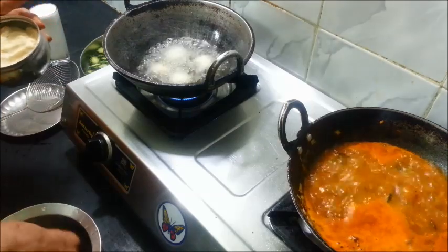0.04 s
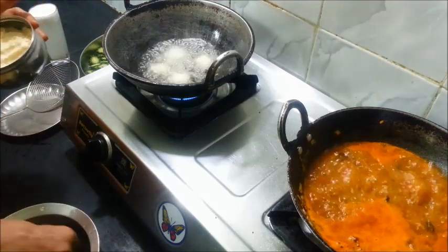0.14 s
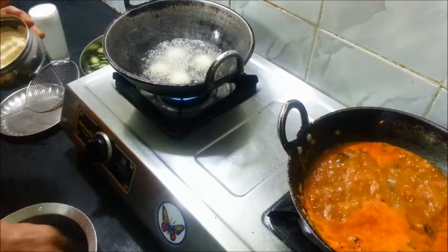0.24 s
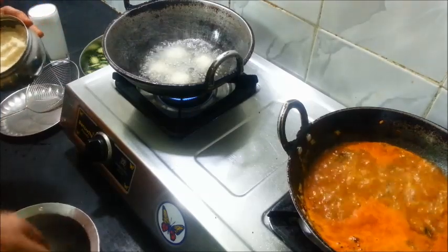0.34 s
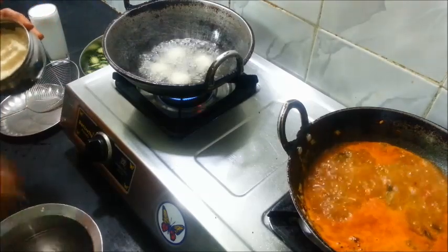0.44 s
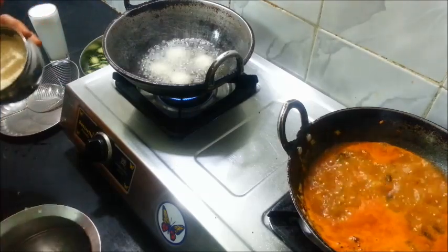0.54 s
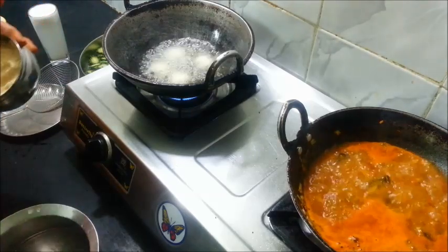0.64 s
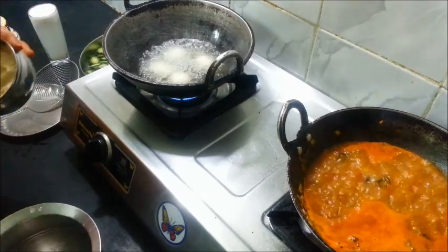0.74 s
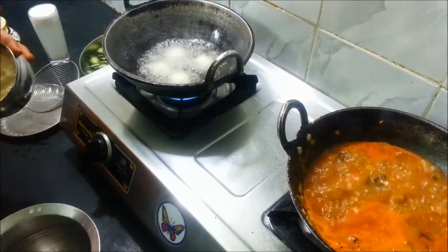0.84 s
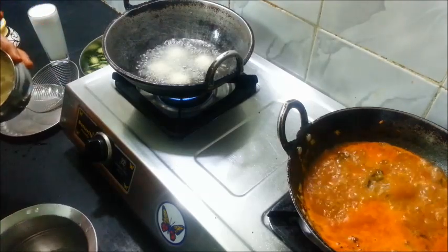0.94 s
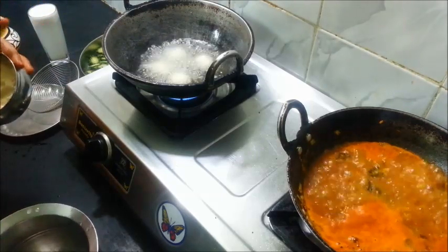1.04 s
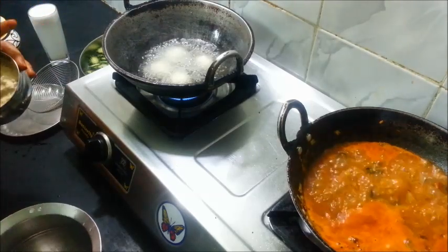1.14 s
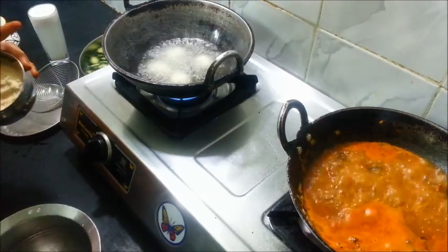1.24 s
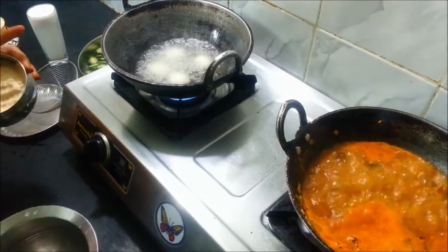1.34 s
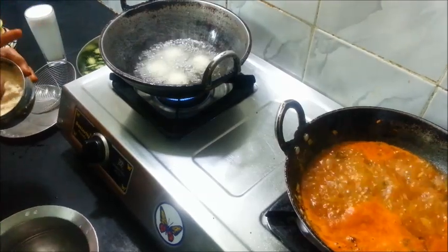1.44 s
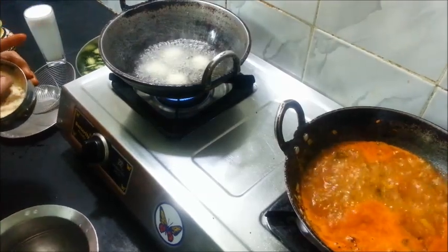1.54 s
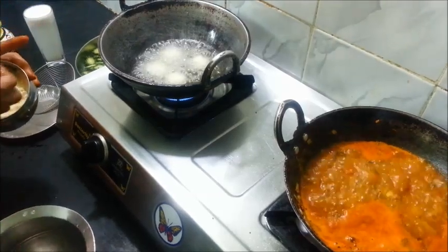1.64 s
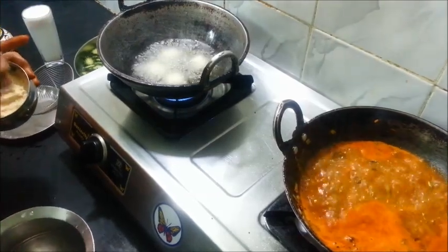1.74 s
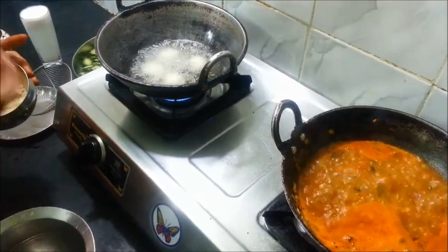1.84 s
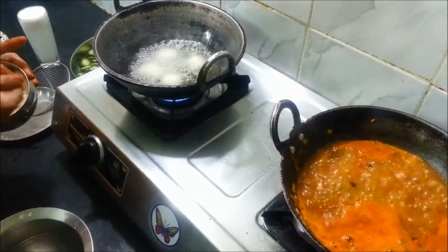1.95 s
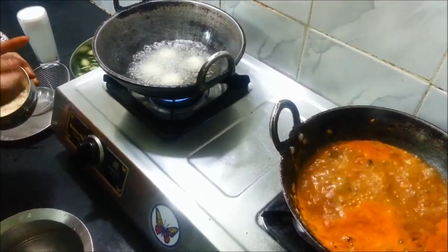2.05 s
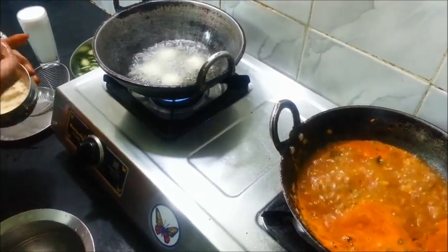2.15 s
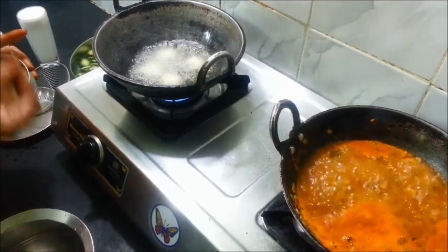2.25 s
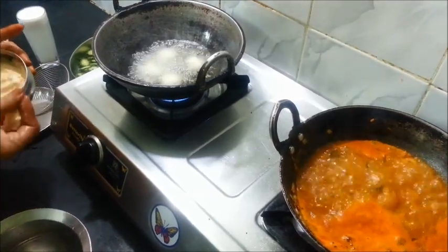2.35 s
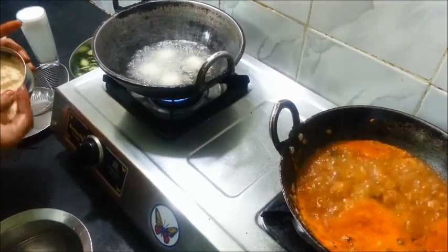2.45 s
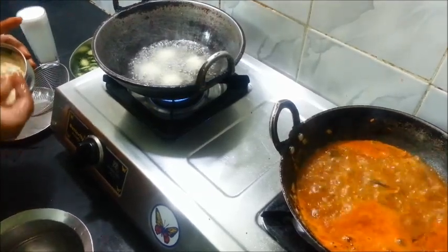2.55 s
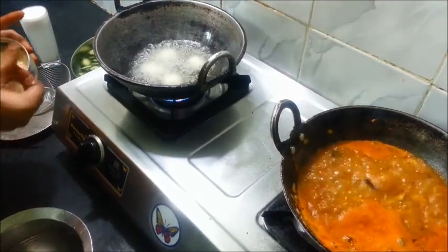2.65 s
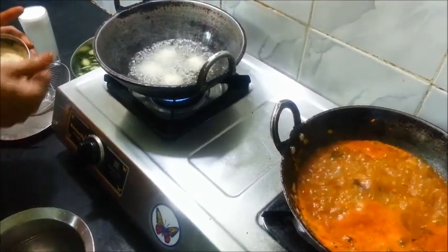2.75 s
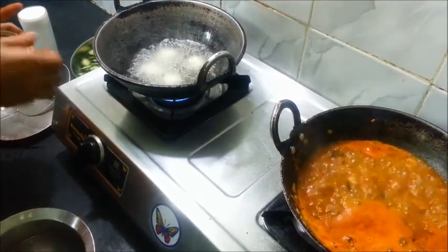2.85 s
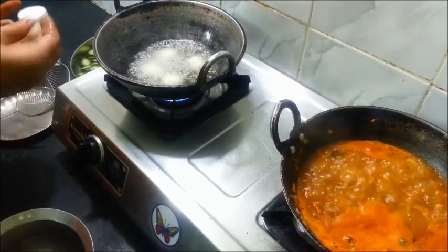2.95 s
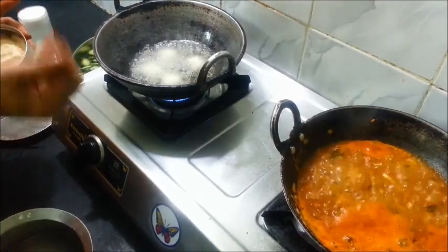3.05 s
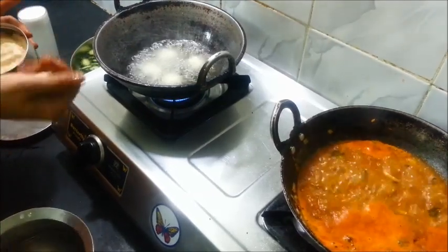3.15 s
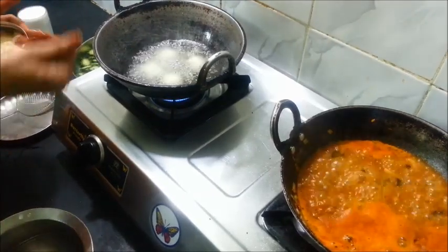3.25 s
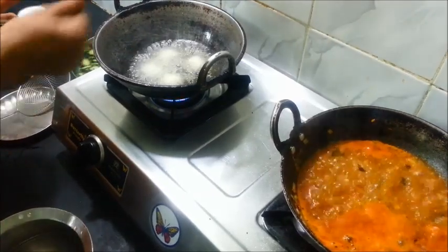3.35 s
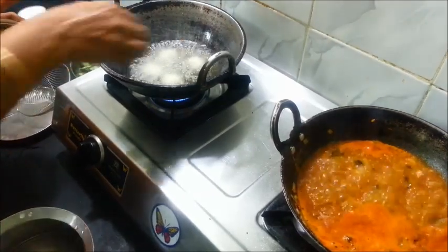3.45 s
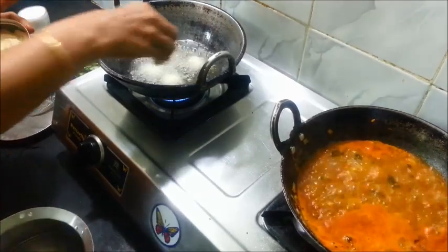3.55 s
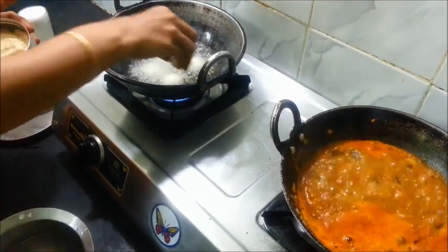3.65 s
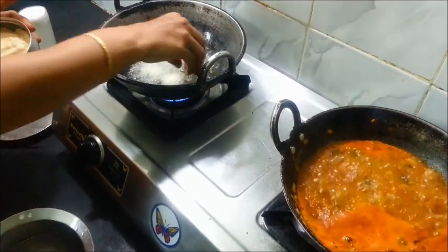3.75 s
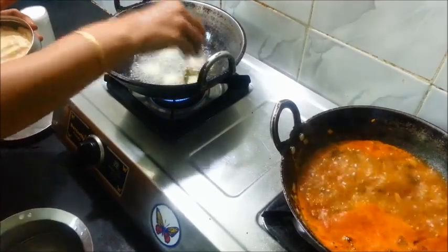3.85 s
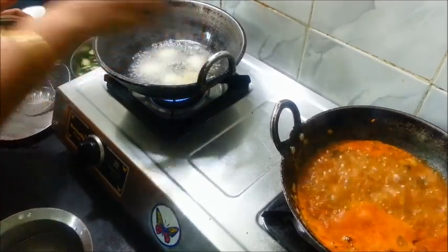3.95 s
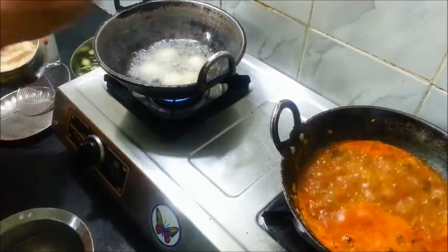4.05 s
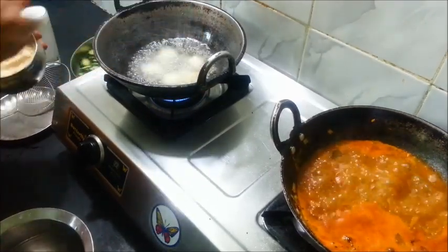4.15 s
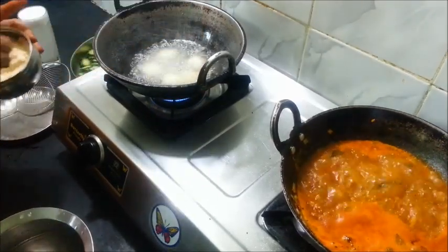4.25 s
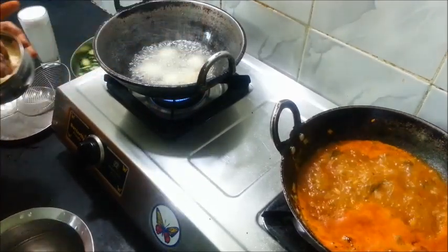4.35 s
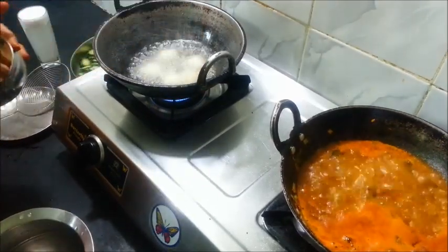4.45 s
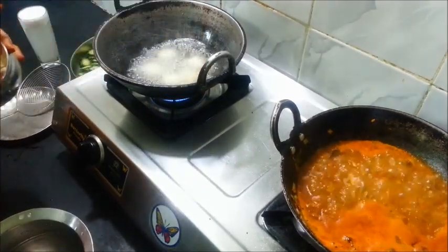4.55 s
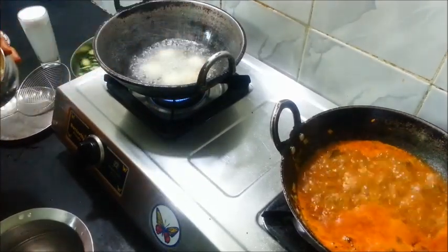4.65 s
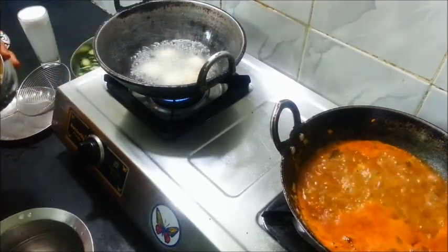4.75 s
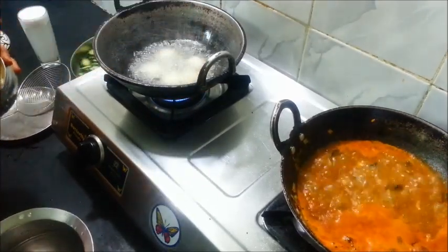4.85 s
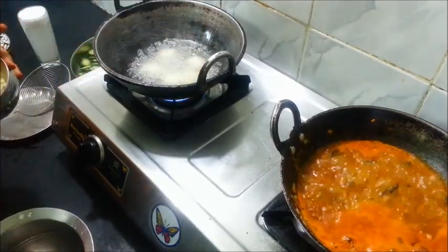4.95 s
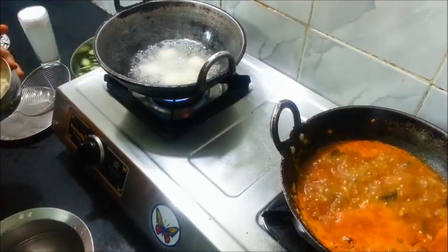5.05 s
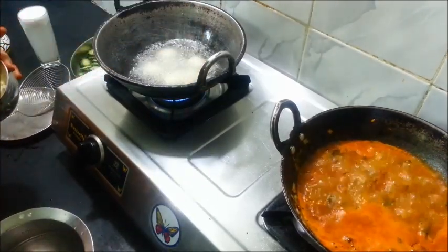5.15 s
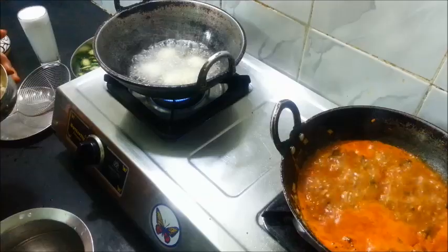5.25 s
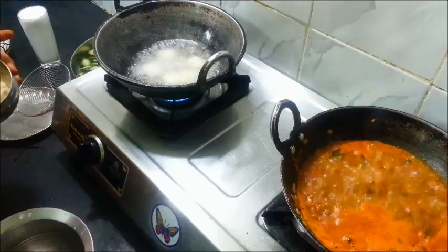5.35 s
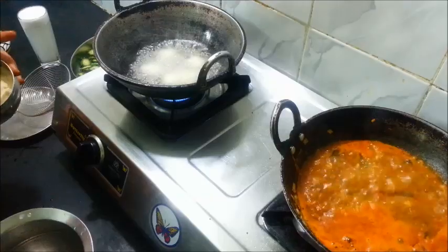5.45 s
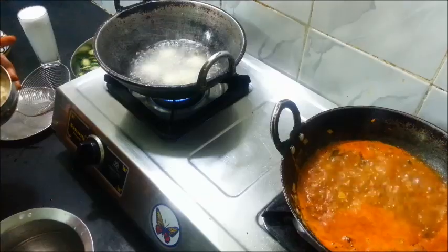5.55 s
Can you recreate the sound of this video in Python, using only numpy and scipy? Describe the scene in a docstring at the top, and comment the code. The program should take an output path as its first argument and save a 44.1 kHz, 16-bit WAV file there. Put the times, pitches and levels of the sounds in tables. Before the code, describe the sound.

A crisp oil sizzle with a cluster of loud, high steam pops opens, then pops become sparse and the frying dwindles, exposing a curry's low plops and a soft gas-flame rush. Near 3.9 seconds batter goes in: sudden splutter, rapid pops both high and lower, and gushes of steam. Short hard kitchen reflections, metallic bowl colour, close two-channel handheld microphone.

```python
"""Fritters sizzle and pop in a pan of hot oil in a tiled kitchen; at 3.9 s fresh batter goes in and splutters.
Steam bubbles burst as short pitched rings that bounce around the iron bowl before the room takes them;
crowds of them, shaped by the flow of steam, make the sizzle and splutter, and water droplets crack dryly.
A curry simmers and plops on the next burner over churning liquid and the rush of gas flames, both filtered noise.
Two microphone ports colour the sound, and the bass thins out briefly four times from about 4.2 to 4.9 s."""
import sys
import numpy as np
from scipy import signal
from scipy.fft import rfft, irfft
from scipy.io import wavfile
from scipy.ndimage import uniform_filter1d

SR = 44100
rng = np.random.default_rng(int(sys.argv[2]) if len(sys.argv) > 2 else 0)


def wav_record(signal):
    """Record a signal, one row per channel, as 16-bit PCM in the file named by sys.argv[1]."""
    frames = np.transpose(np.atleast_2d(signal))
    bounded = np.clip(frames, -1, 1)
    # unit amplitude maps onto the largest positive 16-bit level
    quanta = np.round(bounded * 32767).astype(np.int16)
    wavfile.write(sys.argv[1], SR, quanta)


N = 247401
TIME = np.arange(N) / SR
BINS_HZ = np.fft.rfftfreq(N, 1 / SR) + 1e-3  # just above zero, so its logarithm exists
POP_SIZE = 1024  # samples

# loud steam bubbles bursting in the oil: start_s, level_db (over 5 ms, before trim, room and bowl), pitch_hz, width_hz
STEAM_POPS = [(0.002, -18.5, 7330, 1200), (0.122, -19, 8300, 1700), (0.259, -15, 6220, 1200),
              (0.314, -20.5, 7860, 2000), (0.384, -20, 8000, 2400), (0.44, -20, 6200, 2000),
              (0.5, -18.5, 7680, 1430), (0.612, -20.5, 7100, 2780), (0.6523, -22, 3760, 480),
              (0.965, -18, 8000, 1700), (1.5615, -20, 6770, 900), (1.698, -22, 4840, 2600),
              (1.775, -22, 5100, 2400), (1.971, -26.5, 5460, 3400), (2.249, -26, 5560, 3600),
              (2.48, -21.5, 6330, 2600), (2.611, -24.5, 4740, 1000), (2.955, -15.5, 6260, 1140),
              (3.913, -18, 7400, 2500), (4.003, -16.5, 6130, 1000), (4.092, -24, 2580, 800),
              (4.229, -19, 2500, 850), (4.328, -19, 3020, 1900), (4.356, -23.5, 1960, 520),
              (4.414, -19.5, 5900, 1700), (4.445, -21.5, 5200, 2000), (4.591, -20, 5030, 1700),
              (4.674, -25.5, 3720, 2000), (4.706, -18, 5670, 3200), (4.822, -21.5, 3980, 800),
              (4.862, -24.5, 4400, 1400), (4.967, -17, 2350, 910), (5.072, -20.5, 3660, 1400),
              (5.199, -20, 7100, 1210), (5.258, -19, 6530, 1200), (5.358, -19.5, 7060, 1400),
              (5.5, -24, 4080, 1510), (5.597, -21.5, 4500, 2510)]
# large bubbles breaking in the curry: start_s, peak_db (before trim, room and hollows), pitch_hz
CURRY_PLOPS = [(1.856, -27.5, 1330), (2.206, -22.5, 2480), (2.392, -30, 1200), (2.588, -32.5, 940),
               (2.663, -31, 1480), (3.051, -36, 925), (3.212, -36, 923), (3.488, -33, 945),
               (3.619, -32, 1460), (3.686, -28.5, 1430), (3.841, -31, 1380)]
# droplets of water cracking in the oil: start_s, level_db (over 5 ms, before trim, room and bowl)
WATER_SPITS = [(0.653, -25), (0.793, -22), (1.058, -31), (1.47, -23.5), (2.206, -27), (3.122, -23),
               (3.368, -28), (3.892, -28), (4.116, -21.5), (5.071, -19)]
# steam gushing as a fritter's wet inside breaks open: peak_s, fine_bubbles_db, coarse_bubbles_db
STEAM_GUSHES = [(0.42, -37, -49), (3.45, -33, -59), (4.12, -30, -31), (4.33, -20.5, -33.5),
                (4.56, -45, -33), (4.711, -25, -35.5), (4.87, -27, -44), (5.04, -49, -35),
                (5.31, -25.5, -46)]
# tone curve of the fine frying: frequency_hz, relative_level_db
SIZZLE_CURVE = [(1500, -20.5), (3000, -15.5), (4600, -8), (6000, 2), (7200, -0.5), (9000, -0.5),
                (11000, -5.5), (14500, -19)]
# tone curve of the coarse wet bubbling: frequency_hz, relative_level_db
SPLUTTER_CURVE = [(300, 7), (600, 4), (1000, -11.5), (1600, -2), (2300, -0.5), (3200, 3), (4600, -2),
                  (7000, -10.5), (14000, -36)]
# tone curve of the gas flames: frequency_hz, relative_level_db
FLAME_CURVE = [(25, -13), (60, -8.5), (100, -2.5), (170, -1.5), (500, -22)]
# tone curve of the boiling liquids: frequency_hz, relative_level_db
CHURN_CURVE = [(100, -30), (200, -1.5), (300, 3), (600, 0.5), (1000, -1.5), (1700, -0.5), (3000, -11.5),
               (8000, -52)]
# hollow tones of the burners and pans: frequency_hz, width_hz, gain_db
STOVE_HOLLOWS = [(121.4, 10.7, 9.5), (272.2, 6.5, 11.5), (355, 66, 3.5), (940, 61, 8.5), (1606, 52, 5.5)]
# resonances of the iron bowl, a dip where the gain is negative: frequency_hz, width_hz, gain_db
BOWL_MODES = [(1880, 63, -6.5), (2336, 91, 6), (2430, 17, 3.5), (2510, 15, 3.5), (3430, 10, 10.5),
              (4100, 91, -30), (4650, 9.3, 5), (5250, 35, 2), (6180, 37, 5)]
# tone curves of the microphone ports: frequency_hz, left_db, right_db
PORT_CURVES = [(1070, 1, 0.5), (3330, 3.5, 2.5), (4270, 9.5, 6.5), (5640, 8.5, 4), (6220, -0.5, 7),
               (7180, 0, 15.5), (7860, -4.5, 6), (9150, -5.5, 1), (13700, -2, 0.5)]
# brief thinning of the bass: centre_s, highest_low_edge_hz
BASS_THINNING = [(4.16, 110), (4.35, 284), (4.71, 221), (4.92, 110)]

BATTER_S, BATTER_ATTACK_S = 3.885, 0.019  # the fresh batter meets the oil
GUSH_RISE_S, GUSH_FALL_S = 0.039, 0.095  # each gush swells quickly and ebbs more slowly
OLD_DB, DRYING_DB_PER_S = -30, 1.02  # steam from the fritters already in the pan, dwindling as they dry
CALM_FROM_S, CALM_DB_PER_S = 2.05, 1.97  # extra decline once the older fritters' crust closes
FRESH_DB, CRUSTING_DB_PER_S = -27, 2.5  # steam from the fresh batter, dwindling as its crust forms
CHURN_DB, FRESH_CHURN_DB = -48, -47.5  # boiling liquid, and what the fresh batter adds to it
BASS_DIP_S = 0.11  # half the length of a dip
TOP_HZ = 14800


def undb(db):
    """Decibels to gain."""
    return 10 ** (np.asarray(db) / 20)


def unit(x):
    """Scale to rms 1."""
    return x / np.sqrt(np.mean(x ** 2))


def colour(x, curve):
    """Filter by a tone curve, joining its points along log frequency."""
    hz, db = np.transpose(curve)
    gain = undb(np.interp(np.log(BINS_HZ), np.log(hz), db))
    return irfft(rfft(x) * gain, N)


def resonate(x, modes):
    """Pass a sound through resonances, each a damped oscillator that reaches its gain at its pitch."""
    gain = 1
    for hz, width_hz, db in modes:
        detuning = (BINS_HZ ** 2 - hz ** 2) / (BINS_HZ * width_hz)
        gain = gain + (undb(db) - 1) / (1 + 1j * detuning)
    return irfft(rfft(x) * gain, N)


def add(out, start_s, sound):
    """Mix a stereo sound in at its start time."""
    start = max(int(start_s * SR), 0)
    out[:, start:start + sound.shape[1]] += sound[:, :max(N - start, 0)]


def kitchen(x, early_db=-7, early_t60_s=0.092, late_db=-6, late_t60_s=0.26):
    """Quick reflections off stove and tiles, then the room's short tail, drawn anew for every call."""
    t = TIME[:SR // 3]
    arrived = t > .004
    response = 0
    for db, t60_s in [(early_db, early_t60_s), (late_db, late_t60_s)]:
        decay = np.exp(-np.log(1000) * t / t60_s)
        tail = rng.standard_normal((2, len(t))) * arrived * decay
        response = response + undb(db) * tail / np.linalg.norm(tail, axis=1, keepdims=True)
    response[:, 0] = 1  # the direct sound
    return signal.fftconvolve(x, response, axes=1)[:, :N]


def rush(curve, side, waver_db, wavers_per_s):
    """Coloured noise in the stove's hollows, largely alike at both ports, with a randomly wavering level."""
    centre, apart, waver = rng.standard_normal((3, N))
    noise = centre + side * np.outer([1, -1], apart)
    noise = unit(resonate(colour(noise, curve), STOVE_HOLLOWS))
    waver = unit(uniform_filter1d(waver, SR // wavers_per_s))
    return noise * undb(waver_db * waver)


def flames():
    """Gas flames rush as low noise whose level throbs irregularly."""
    return rush(FLAME_CURVE, side=0.47, waver_db=2.0, wavers_per_s=7) * undb(-56.0)


def batter_in():
    """0 before the fresh batter meets the oil, rising quickly to 1."""
    return np.clip((TIME - BATTER_S) / BATTER_ATTACK_S, 0, 1)


def churn():
    """Boiling liquid tumbles as wavering noise, stronger once the fresh batter is in."""
    boil = np.hypot(undb(CHURN_DB), undb(FRESH_CHURN_DB) * batter_in())
    return rush(CHURN_CURVE, side=0.49, waver_db=1.43, wavers_per_s=16) * boil


def ring(hz, width_hz):
    """The open cavity of a burst bubble swells and dies quickly, the faster the wider its resonance; energy 1."""
    t = np.arange(POP_SIZE) / SR
    flow = t * np.exp(-np.pi * width_hz * t) * np.sin(2 * np.pi * hz * t)
    wave = np.gradient(flow)  # a small opening radiates the change of its flow, so the bass is weak
    return wave / np.linalg.norm(wave)


def bounce(wave, spread_s=.0042, echo=0.47, count=12):
    """A burst reaches each port directly and off the walls of the pan; the energy stays 1."""
    paths = np.zeros((2, POP_SIZE // 2))
    for path in paths:
        lags = (np.arange(count) + rng.random(count)) / count * spread_s * SR
        lags = np.clip(lags, 0, len(path) - 1).astype(int)
        path[lags] = echo * rng.choice([-1, 1], count)
        path[rng.integers(POP_SIZE // 128)] += 1  # the direct sound, within 8 samples
    heard = signal.fftconvolve(paths, wave[None], axes=1)
    return heard / np.linalg.norm(heard, axis=1, keepdims=True)


def bubbles(per_s, scatter_db, damping, echo, low_hz, high_hz, spots=28, parts=3):
    """Random bursts from many spots in one or more parts of the pan, each spot with its own pitch; rms 1."""
    crowd = np.zeros((parts, 2, N))
    for spot, hz in enumerate(np.geomspace(low_hz, min(high_hz, SR / 3), spots)):
        when, chance, chosen = rng.random((N // 100, 3)).T
        active = chosen < per_s * N / SR / spots / len(when)
        sizes = undb(-scatter_db * np.log(.03 + .97 * chance))  # a few are much larger
        bursts = np.bincount((when * N).astype(int), sizes * active, N)
        burst = np.sqrt(hz) * bounce(ring(hz, damping * hz), echo=echo)
        crowd[spot % parts] += signal.oaconvolve(bursts[None], burst, axes=1)[:, :N]
    return unit(sum(kitchen(part) for part in crowd))


def curry(level_db=0, width_hz=650, simmer_db=-56):
    """Thick sauce simmers and breaks in soft, low plops that sound the hollow of its pan."""
    simmer = bubbles(per_s=29, scatter_db=4.5, damping=0.35, echo=0.54, low_hz=816, high_hz=1540,
                     spots=5, parts=1)
    out = undb(simmer_db) * simmer
    for start_s, db, hz in CURRY_PLOPS:
        plop = bounce(ring(hz, width_hz), spread_s=.008, echo=0.38)
        add(out, start_s, undb(db + level_db) * kitchen(plop / np.abs(plop).max()))
    return resonate(out, STOVE_HOLLOWS)


def spits(level_db=0.0):
    """A droplet of water flashes to steam: a dry crack with hardly any pitch."""
    out = np.zeros((2, N))
    window = SR / 200  # 5 ms in samples, turning level into energy
    crack = ring(hz=6840, width_hz=5600)
    for start_s, db in WATER_SPITS:
        heard = kitchen(bounce(crack, spread_s=.005, echo=0.52))
        add(out, start_s, undb(db + level_db) * np.sqrt(window) * heard)
    return out


def pops(level_db=-1.0, snap_db=-16, stove_db=-7.5, tail_db=-5, tail_t60_s=0.33):
    """Single large steam bubbles: the skin tears with a snap as the cavity rings, lingering in pan and room."""
    out = np.zeros((2, N))
    window = SR / 200  # 5 ms in samples, turning level into energy
    tear = ring(hz=7600, width_hz=5200)
    for start_s, db, hz, width_hz in STEAM_POPS:
        snap = undb(snap_db) * bounce(tear, echo=0.16)
        cavity = bounce(ring(hz, width_hz), spread_s=.004, echo=.6)
        heard = kitchen(snap + cavity, early_db=stove_db, late_db=tail_db, late_t60_s=tail_t60_s)
        add(out, start_s, undb(db + level_db) * np.sqrt(window) * heard)
    return out


def steam():
    """Flow of steam as gains: from the older fritters, from the fresh batter, and in fine and coarse gushes."""
    calming_db = CALM_DB_PER_S * np.maximum(TIME - CALM_FROM_S, 0)
    old = undb(OLD_DB - DRYING_DB_PER_S * TIME - calming_db)
    fresh = batter_in() * undb(FRESH_DB - CRUSTING_DB_PER_S * (TIME - BATTER_S))
    fine, coarse = 0, 0
    for peak_s, fine_db, coarse_db in STEAM_GUSHES:
        swell = np.exp(-np.maximum((peak_s - TIME) / GUSH_RISE_S, (TIME - peak_s) / GUSH_FALL_S))
        fine = fine + undb(fine_db) * swell
        coarse = coarse + undb(coarse_db) * swell
    return old, fresh, fine, coarse


def oil(sizzle_db=-4.0, old_splutter_db=-13, fresh_splutter_db=-11, froth_db=-6,
        tick_db=-12, gush_tick_db=-3, small_pops_db=-6):
    """Tiny bubbles fizz, crisp skins tick and wet batter throws larger bubbles; all follow the steam."""
    fine = bubbles(per_s=1400, scatter_db=3.0, damping=0.38, echo=0.38, low_hz=2094, high_hz=14640)
    ticks = bubbles(per_s=90, scatter_db=3.0, damping=0.9, echo=0.52, low_hz=6700, high_hz=12000,
                    spots=6, parts=1)
    froth = rng.standard_normal((2, N))  # bursts too many to tell apart
    sizzle = unit(colour(fine + undb(froth_db) * froth, SIZZLE_CURVE))
    coarse = bubbles(per_s=1000, scatter_db=3.5, damping=0.33, echo=0.69, low_hz=686, high_hz=10960)
    splutter = unit(colour(coarse, SPLUTTER_CURVE))
    small_pops = bubbles(per_s=50, scatter_db=2.5, damping=0.26, echo=0.36, low_hz=4730, high_hz=8340,
                         spots=8, parts=1)

    # steam flows add as powers
    old, fresh, fine_gush, coarse_gush = steam()
    frying = np.linalg.norm([old, fresh, fine_gush], axis=0) * undb(sizzle_db)
    old_wet, fresh_wet = old * undb(old_splutter_db), fresh * undb(fresh_splutter_db)
    wet = np.linalg.norm([old_wet, fresh_wet, coarse_gush], axis=0)
    crisp = undb(tick_db) * np.hypot(old, undb(gush_tick_db) * fine_gush)
    return (sizzle + undb(small_pops_db) * small_pops) * frying + splutter * wet + ticks * crisp


def scene():
    """The oil rings its pan beside the curry; the liquids churn and the gas flames throb beneath."""
    background = flames() + churn() + curry()
    pan = spits() + pops() + oil()
    return background + resonate(pan, BOWL_MODES)


def thin_bass(x):
    """Take away the lows under an edge that rises and falls with each dip."""
    hz, s, frames = signal.stft(x, SR, nperseg=2 * POP_SIZE)
    edge_hz = 1 + sum(top_hz * np.exp(-((s - at_s) / BASS_DIP_S) ** 2) for at_s, top_hz in BASS_THINNING)
    ratio = (hz[:, None] / edge_hz) ** 4  # a fourth-order slope
    thinned = frames * ratio / np.hypot(1, ratio)
    return signal.istft(thinned, SR, nperseg=2 * POP_SIZE)[1][:, :N]


def record(dry):
    """Each port has its own tone curve; the bass dips, peaks clip at full scale and the top is cut steeply."""
    ports = np.array(PORT_CURVES)
    left = colour(dry[0], ports[:, :2])
    right = colour(dry[1], ports[:, ::2])
    heard = np.clip(thin_bass(np.array([left, right])), -1, 1)
    top_cut = signal.ellip(10, .2, 70, TOP_HZ, fs=SR, output="sos")
    return signal.sosfilt(top_cut, heard)


dry = scene()
out = record(dry)
wav_record(out)
```